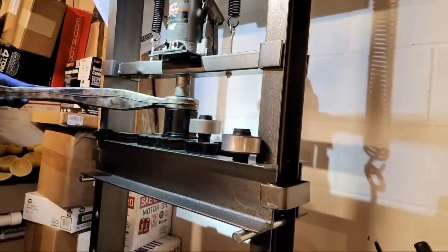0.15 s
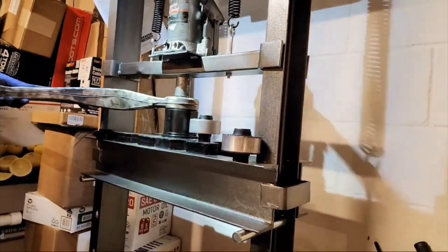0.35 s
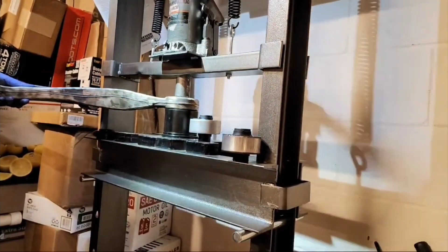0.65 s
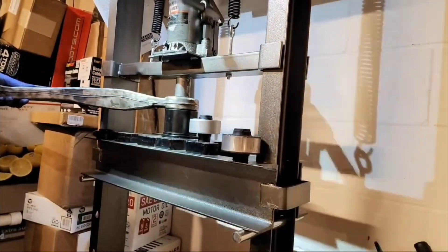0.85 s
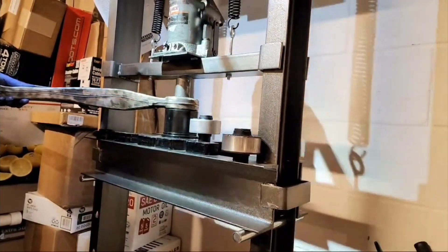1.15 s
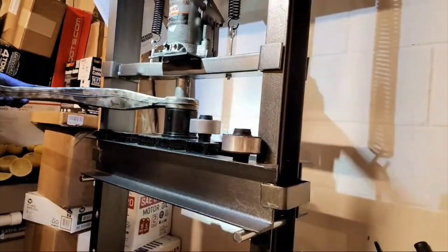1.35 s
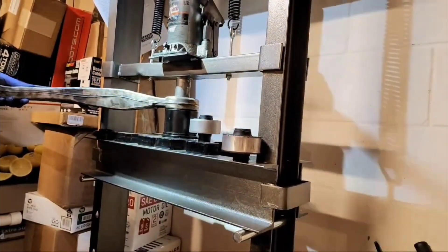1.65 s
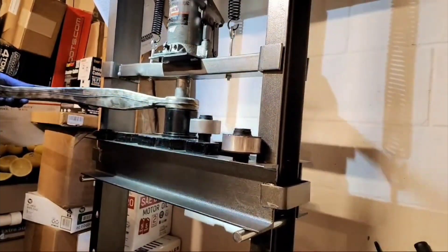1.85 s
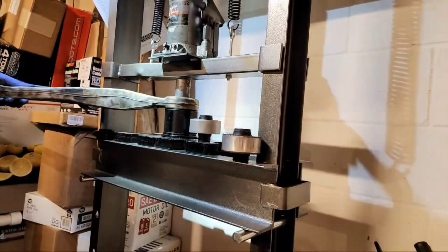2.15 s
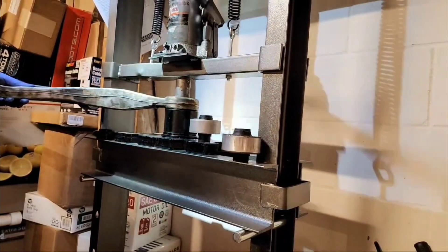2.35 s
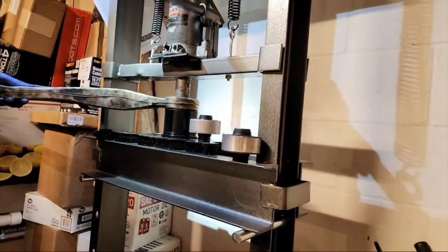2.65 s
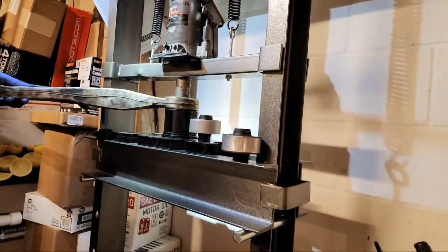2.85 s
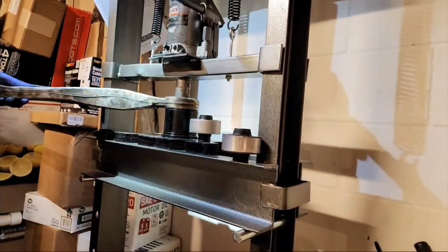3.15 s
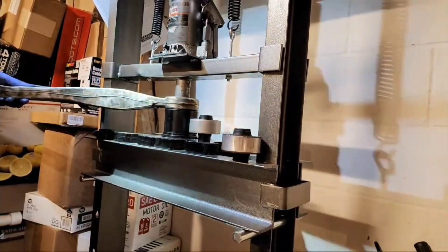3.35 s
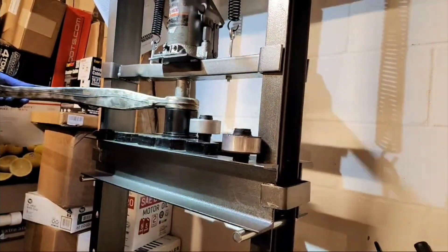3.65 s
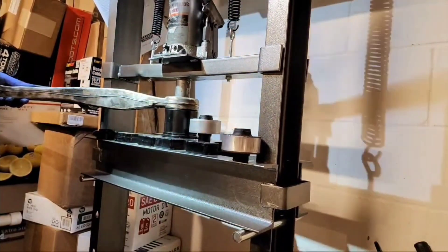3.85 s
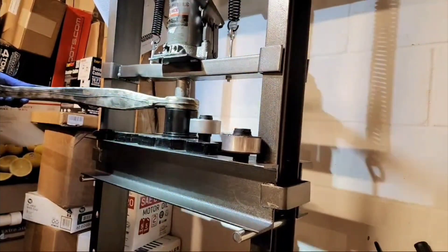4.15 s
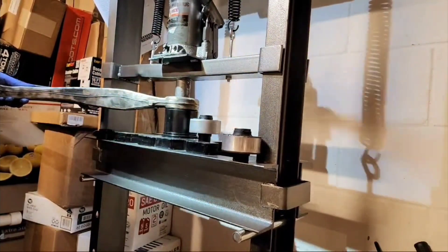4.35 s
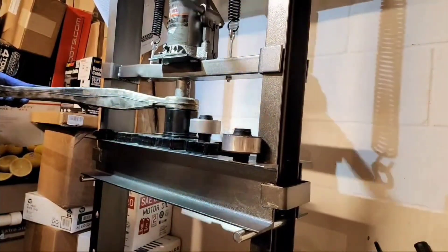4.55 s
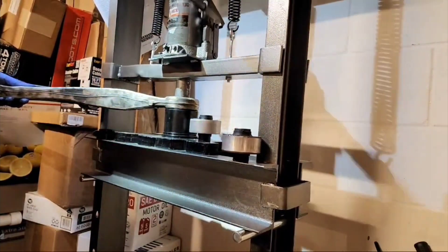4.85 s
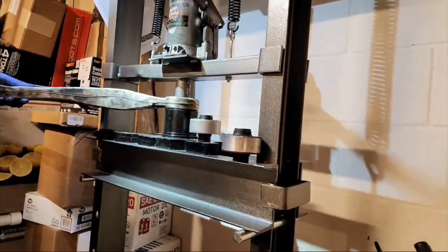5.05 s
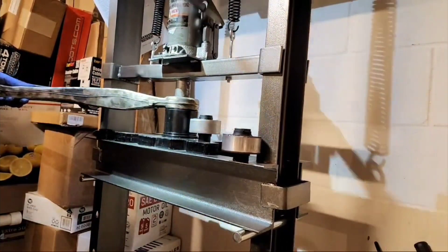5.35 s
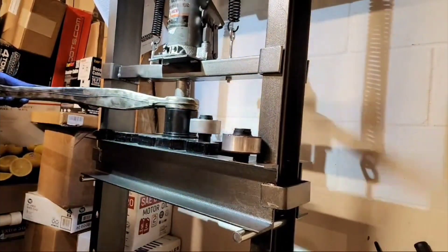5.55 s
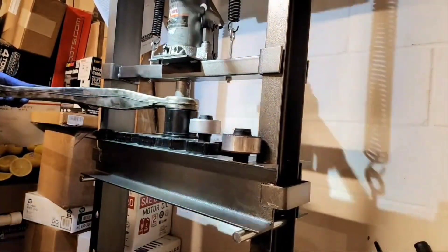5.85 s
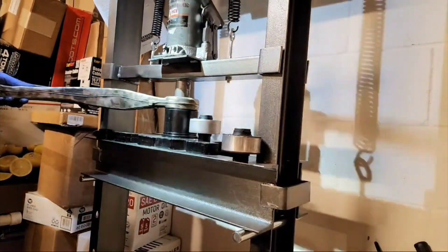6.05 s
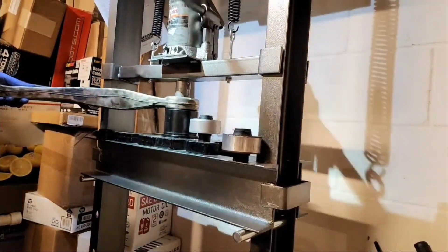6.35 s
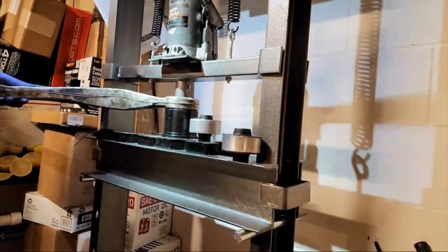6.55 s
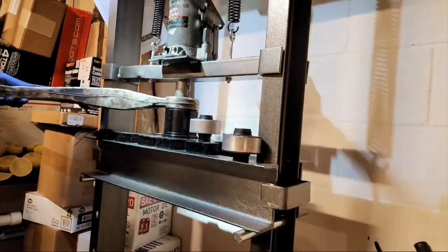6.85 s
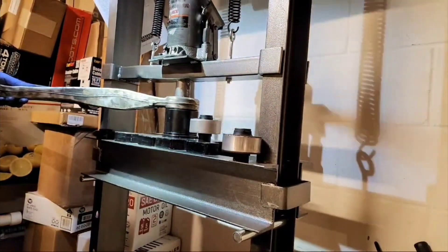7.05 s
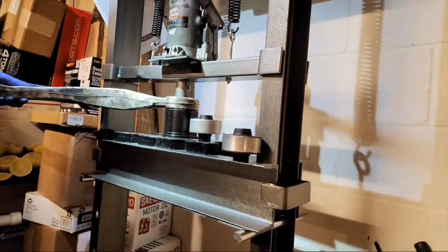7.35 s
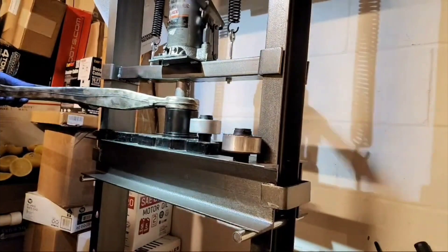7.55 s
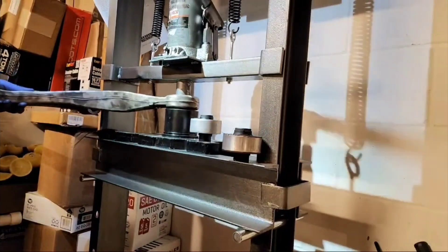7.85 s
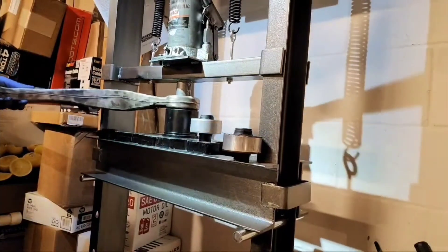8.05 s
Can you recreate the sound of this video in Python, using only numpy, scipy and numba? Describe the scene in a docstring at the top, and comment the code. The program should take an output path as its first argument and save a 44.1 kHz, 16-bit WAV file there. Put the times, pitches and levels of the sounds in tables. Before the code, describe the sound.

A hydraulic jack in a steel shop press is pumped by hand in a small workshop. From the start to about 1.6 seconds the strokes come very fast, six or seven pumps a second, clipped as if sped up. Every push and lift gives a bright, high chatter of loose metal linkage and a clack of pins, with a lighter piston knock and a dull thud from the frame. From about 1.7 seconds the pace drops to a steady two pumps or so a second, each with a down and an up clatter and a short room echo. The handle knocks its stop and rings faintly at around 1.8, 2.8, 3.7, 4.6 and 5.9 seconds. At about 7.7 seconds a longer, louder rattle ends the pumping, followed by a few tiny settling ticks just after 8 seconds. A faint low rumble and hiss lie underneath throughout.

```python
"""Pumping a bottle jack

A bottle jack in a steel shop press is pumped by hand in a small workshop; the opening strokes run at
triple speed with clipped tails, like a time-lapse. At each turn of the handle the loose linkage chatters
brightly and pins clack in the pump body; a moment later the piston knocks and the frame thuds. Each is
a train of impacts filtered by the resonances of the steel. The room answers with a short tail over a
low rumble, and a longer rattle ends the pumping."""
import sys
import numpy as np
from scipy import signal
from scipy.fft import rfft, irfft
from scipy.io import wavfile
from scipy.ndimage import uniform_filter1d, minimum_filter1d
from numba import njit

SR = 44100
rng = np.random.default_rng(int(sys.argv[2]) if len(sys.argv) > 2 else 0)


def unload_audio(sound):
    """Save the sound as a 16-bit wav file, at the path given as the first command line argument."""
    columns = np.transpose(np.atleast_2d(sound))
    # keep every value between -1 and 1, then stretch to whole-number steps
    steps = np.round(np.clip(columns, -1, 1) * 32767)
    wavfile.write(sys.argv[1], SR, steps.astype(np.int16))


N = 362051

# Spectra of the four impact sounds and of the room's hiss: frequency_hz, density_db
CHATTER_SPECTRUM = [(3180, -47), (5400, -36.5), (5790, -32), (7190, -36), (9090, -27.5), (10200, -11.5),
                    (11100, -14.5), (11300, -9), (11800, 0), (12500, -1.5), (13300, -3), (14600, -14.5),
                    (15500, -25)]  # includes the microphone's dip and treble peak
PUMP_SPECTRUM = [(1060, -30), (1800, -7.5), (2520, -10), (2750, -10), (3140, -4), (3420, -3.5),
                 (3960, -4.5), (4370, -2.5), (5020, -8.5), (5600, -29), (7280, -34), (12300, -120)]
PISTON_SPECTRUM = [(440, -10), (750, -1), (998, -2.5), (1110, 4.5), (1370, 4), (1470, 1), (1580, 1),
                   (2300, -1.5), (2990, -14), (5060, -120)]
FRAME_SPECTRUM = [(100, -39), (170, -7), (376, 3), (439, -1), (480, 1.5), (720, 0), (900, -7.5),
                  (1170, -18), (1980, -120)]
HISS_SPECTRUM = [(15, -53), (25, -13), (161, 5.5), (363, 0), (503, -8), (1130, -11), (1650, -13),
                 (2840, -27.5), (3520, -17), (6740, -60), (9320, -33), (12200, -14), (16000, -52.5)]
# The hiss sinks slowly, wavers and fades quickly at the very end: time_s, gain_db
HISS_LEVEL = [(0, 4.5), (7.9, 1.5), (8.03, -1.5), (8.16, 2), (8.21, -5.5)]
# The rumble swells slowly: time_s, gain_db
RUMBLE_SWELL = [(0, -63.5), (1.5, -68), (3.2, -64), (3.55, -59.5), (4.1, -59), (5.1, -65), (6.3, -64.5),
                (8.2, -70)]
# Base decay time, which each source scales; clipped in the triple-speed opening: time_s, t60_s
DECAY = [(0, 0.11), (1.55, 0.058), (1.65, 0.32), (7.6, 0.21), (8.2, 0.39)]
# Modes of the handle: pitch_hz, level_db, t60_s
HANDLE_MODES = [(578, -6, 0.25), (643, -9, 0.14), (1055, -5.5, 0.63), (1937, -2.5, 0.15), (2490, -8, 0.034),
                (3040, -4.5, 0.3), (4215, -6, 0.19), (4206, -5, 0.13)]
# Resonances of the steel, fed by every rattle: pitch_hz, width_hz, gain_db
STEEL_MODES = [(396, 57, -14), (480.8, 12, -3), (634, 14, -4), (892, 33, -0.5), (1122, 16, -12.5),
               (1472, 18, 5), (1662, 6, -8.5), (2450, 2.8, -12.5), (2506, 23, 2), (3084, 44, 1.5),
               (3160, 26, -3), (3770, 22, -1), (4298, 28, 2), (4470, 27, -3), (10570, 59, 7),
               (10940, 63, 2.5), (11580, 28, -9), (12200, 39, -1.5), (12700, 52, -2), (12900, 90, -9.5)]
# Lingering modes of the press frame: pitch_hz, width_hz, gain_db
FRAME_MODES = [(647, 33, -1), (740, 35, -8), (1115.4, 19, 1.5), (1664, 9.2, -3), (2300, 25, -11),
               (3210, 92, -14), (4370, 67, -10)]
# Handle pushed down; delays count from the take-up of play: start_s, full_chatter_delay_s, load_delay_s,
# thud_delay_s, first_chatter_db, full_chatter_db, take_up_db, load_db, knock_db, thud_db,
# chatter_hz, load_hz, knock_hz, thud_hz
PUSHES = [(0.048, .008, 0.023, 0.023, -26, -26.5, -40, -30.5, -29, -31, 12500, 3740, 1110, 800),
          (0.208, 0.011, 0.014, 0.018, -33.5, -25, -39, -34, -38.5, -36, 12000, 3413, 1420, 745),
          (0.373, .005, 0.0088, .010, -27, -24, -37.5, -35, -40.5, -39, 12000, 4390, 1500, 804),
          (.503, 0.019, 0.031, 0.029, -43, -26.5, -43, -36.5, -38, -38, 12200, 3500, 1610, 742),
          (0.671, 0.0043, .012, 0.021, -32, -25, -43, -39.5, -36, -36, 12200, 4300, 1450, 467),
          (0.819, 0.012, 0.022, 0.026, -40, -35.5, -38, -43, -39.5, -41.5, 12500, 4400, 1660, 660),
          (0.976, 0.006, 0.019, 0.018, -38, -25.5, -40, -37.5, -42.5, -36.5, 12166, 4240, 1100, 484),
          (1.139, 0.0068, 0.0051, 0.014, -25, -22, -37, -33.5, -35, -39, 12600, 4200, 1420, 407),
          (1.286, 0.017, .018, 0.015, -44, -27, -44, -34.5, -36, -35.5, 12100, 3994, 1290, 520),
          (1.438, 0.0054, 0.025, .016, -37, -36, -41, -38, -40, -37, 12160, 4370, 1700, 660),
          (1.673, 0.013, 0.033, 0.043, -38, -29.5, -39, -35, -35, -38, 12500, 4160, 1410, 520),
          (2.131, 0.022, 0.037, 0.056, -24.5, -24.5, -31, -30, -33.5, -35, 12700, 3950, 1397, 370),
          (2.603, .015, 0.034, 0.046, -29, -25, -33, -29.5, -30.5, -34.5, 12500, 3500, 1113, 360),
          (3.066, 0.0033, 0.034, 0.05, -34, -25.5, -32, -34, -32.5, -39.5, 12050, 4040, 1450, 730),
          (3.515, 0.021, 0.028, 0.04, -32.5, -24.5, -34.5, -33.5, -33, -41, 11600, 3560, 1416, 624),
          (3.978, .015, 0.036, 0.04, -29.5, -25, -31.5, -31.5, -33.5, -37.5, 12000, 3930, 1480, 710),
          (4.42, .004, 0.035, .040, -23, -24.5, -32, -33, -34.5, -36, 13000, 4500, 1430, 694),
          (4.879, 0.0061, 0.037, 0.042, -26, -26.5, -32, -37.5, -35.5, -40.5, 12600, 4430, 1370, 460),
          (5.337, .011, 0.037, 0.042, -29.5, -26, -32.5, -36.5, -34, -39, 12800, 3120, 1460, 640),
          (5.784, 0.021, .038, 0.045, -25.5, -24, -32, -36, -36, -40.5, 12400, 3400, 1460, 653),
          (6.243, 0.01, 0.036, 0.044, -28, -20, -31.5, -35.5, -34.5, -40, 13200, 3800, 1530, 655),
          (6.686, 0.021, 0.044, 0.044, -30, -23.5, -33, -36, -36.5, -41.5, 12900, 3950, 1210, 555),
          (7.135, 0.023, 0.037, 0.031, -24.5, -23, -32, -31, -39, -43, 12900, 4870, 1380, 680),
          (7.59, 0.022, 0.039, 0.031, -38.5, -21, -37, -32, -37, -46, 11250, 4540, 830, 615)]
# Handle pulled up: start_s, rattle_delay_s, rattle_length_s, top_delay_s, first_chatter_db, rattle_db,
# first_clack_db, top_clack_db, knock_db, thud_db, chatter_hz, first_clack_hz, top_clack_hz
LIFTS = [(0.095, 0.031, 0.0049, .018, -35, -21, -31, -45, -47, -41, 12000, 3854, 3854),
         (0.275, 0.015, 0.0085, .014, -26.5, -29, -44.5, -50, -60, -57, 11800, 4400, 4328),
         (0.427, 0.015, 0.013, 0.02, -34.5, -30, -38, -31, -41, -43.5, 12300, 3470, 4200),
         (0.58, 0.0092, 0.0086, 0.012, -31, -21.5, -45, -37, -45, -54, 12400, 3420, 3400),
         (0.739, 0.0085, 0.0073, 0.013, -25.5, -28, -35.5, -31, -44.5, -53, 12600, 4200, 4123),
         (0.885, 0.021, 0.013, 0.024, -33.5, -26.5, -38, -28, -44.5, -42.5, 12300, 4840, 4230),
         (1.047, 0.0087, 0.0065, 0.01, -29, -20.5, -39.5, -35.5, -51, -47, 12833, 3970, 4030),
         (1.204, 0.0049, 0.018, .015, -28, -26.5, -44, -25, -44, -54, 12661, 4425, 4270),
         (1.349, 0.025, .012, 0.024, -33, -24, -37.5, -30, -42, -47.5, 12100, 4200, 4300),
         (1.509, 0.024, 0.0076, 0.029, -37, -28, -42, -40.5, -48, -56, 12760, 4250, 4300),
         (1.825, 0.057, 0.018, 0.11, -28.5, -24, -30, -41.5, -46, -51.5, 12900, 3020, 4300),
         (2.328, 0.021, 0.016, .056, -33.5, -25, -35.5, -29.5, -42.5, -45.5, 12400, 4400, 3280),
         (2.739, 0.052, 0.021, 0.1, -21.5, -20, -27.5, -31.5, -41, -44, 12100, 3100, 3440),
         (3.249, 0.026, 0.034, 0.053, -31.5, -22, -36.5, -27.5, -49, -46.5, 12750, 4750, 4250),
         (3.654, 0.05, 0.061, 0.09, -28.5, -31, -32, -28.5, -42.5, -49.5, 12200, 4080, 3730),
         (4.161, 0.021, 0.036, 0.052, -34, -22.5, -35.5, -28, -44, -44, 12000, 3100, 4300),
         (4.580, 0.048, 0.021, 0.094, -34, -22.5, -34.5, -27, -44, -46.5, 12300, 3850, 4460),
         (5.072, 0.0323, 0.028, 0.03, -30.5, -18, -38.5, -29.5, -45.5, -45, 12600, 4860, 4170),
         (5.538, 0.026, 0.038, 0.051, -29.5, -26, -37.5, -29.5, -44, -47.5, 12800, 3230, 3160),
         (5.929, 0.063, 0.02, 0.11, -25.5, -26.5, -31, -29.5, -48, -47.5, 11200, 3920, 4050),
         (6.428, 0.023, 0.031, 0.045, -33, -20.5, -41, -25.5, -41.5, -47.5, 13100, 3030, 3170),
         (6.876, .031, 0.028, 0.049, -36.5, -24, -41, -29.5, -44.5, -52.5, 12700, 3900, 3180),
         (7.325, 0.027, 0.016, 0.06, -39, -22.5, -43.5, -33.5, -48, -50.5, 12200, 3180, 3160)]
# The loose handle shifts between strokes: start_s, chatter_db, clack_db, clack_hz
NUDGES = [(0, -44, -44.5, 4400), (2.036, -52, -56, 3900), (2.071, -51, -49, 4140),
          (2.572, -37.5, -39.5, 4160), (2.972, -60, -51, 4170), (3.057, -38, -42.5, 3130),
          (3.436, -52, -56.5, 4328), (3.866, -58, -58.5, 4180), (3.919, -61, -55, 2030),
          (4.34, -42.5, -40.5, 2220), (4.809, -36, -37, 4400), (5.259, -55.5, -50, 4140),
          (5.710, -49.5, -55, 4300), (6.604, -60, -50.5, 4440), (7.112, -48, -57, 4285),
          (7.890, -48, -48.5, 3000), (8.056, -57.5, -71, 4300), (8.151, -68, -82, 4200)]
# The handle strikes its stop: start_s, ring_db, knock_db, thud_db
STOPS = [(1.8374, -37.5, -35.5, -45.5), (2.755, -33, -32, -40.5), (3.6624, -32.5, -38, -42.5),
         (4.351, -57, -54, -51), (4.5816, -44.5, -39.5, -45.5), (4.8166, -60, -50, -54),
         (5.94, -36.5, -36, -39.5)]
# Last rattle, a row each for links, pins, piston and frame: rise_s, hold_s, level_db, fall_db_per_s
LAST_RATTLE = [(.03, 0.023, -14, 234), (0.0056, 0.033, -21.5, 200), (0.0057, 0.068, -29, 170),
               (0.007, 0.024, -38.5, 310)]
# The parts settle: start_s, level_db
TICKS = [(8.056, -49)]

TRIPLE_SPEED_UNTIL_S, LAST_RATTLE_S = 1.6, 7.683
# Envelope of each kind of blow, at triple speed then at normal speed: rise_s, hold_s
TAKE_UP, LOAD = ((.011, .012), (.0034, .014)), ((.0052, .013), (.00079, .022))
KNOCK, THUD = ((.01, .018), (.01, .015)), ((.01, .019), (.012, .04))
FIRST_CHATTER, FIRST_CLACK = ((.011, .014), (.0062, .0087)), ((.007, .016), (.007, .014))
TOP_CHATTER, TOP_CLACK = ((.003, .0065), (.003, .013)), ((.005, .0071), (.005, .0073))
LIFT_KNOCK, LIFT_THUD = ((.004, .013), (.015, .031)), ((.003, .013), (.011, .042))
RATTLE_CLACK = (.003, .013), (.003, .018)
# Pairs of settings: at triple speed, at normal speed
FIRST_RISE_S, FULL_RISE_S, RATTLE_RISE_S = (.0092, .002), (.008, .0038), (.0072, .007)
OVERRUN_S, TAKE_UP_HZ = (.00077, .0075), (4160, 3116)
DRAG_DB, RATTLE_CLACK_DB, STEEL_DB = (-35, -39.5), (-20, -12), (-2.5, .5)


def undb(db):
    """Amplitude ratio of a level in decibels."""
    return 10 ** (np.asarray(db) / 20)


def unit(x):
    """Normalisation to unit RMS."""
    return x / np.sqrt(np.mean(x ** 2))


def curve(points):
    """Linear interpolation of (time_s, value) points at every sample."""
    return np.interp(np.arange(N) / SR, *np.transpose(points))


def colour(x, spectrum):
    """Minimum-phase filtering to a given spectral shape; white noise keeps its power."""
    hz, db = np.transpose(spectrum)
    grid_hz = np.maximum(np.arange(2049) * SR / 4096, 1)
    grid_db = np.interp(np.log(grid_hz), np.log(hz), db, left=-70)
    cepstrum = irfft(grid_db * np.log(10) / 20)
    cepstrum[1:2048] *= 2  # folding onto positive time makes the filter causal
    cepstrum[2049:] = 0
    response = irfft(np.exp(rfft(cepstrum)))
    return signal.fftconvolve(x, response / np.sqrt(np.sum(response ** 2)))[:N]


@njit
def resonator(x, hz, damping):
    """Second-order resonance with a moving centre, unit gain there and Q = 1 / damping."""
    y, band, low = np.empty(len(x)), 0., 0.
    for i in range(len(x)):
        g = np.tan(np.pi * hz[i] / SR)
        velocity = (band + g * (x[i] - low)) / (1 + g * (g + damping))
        band, low = 2 * velocity - band, low + 2 * g * velocity
        y[i] = damping * velocity
    return y


@njit
def stored_energy(power, retention):
    """Leaky integration: energy accumulates and drains exponentially."""
    y, energy = np.empty(len(power)), 0.
    for i in range(len(power)):
        energy = energy * retention[i] + power[i] * (1 - retention[i])
        y[i] = energy
    return y


def forced_modes(x, modes):
    """Forced response: each narrow resonance passes the part of the drive near its pitch."""
    return sum(undb(db) * signal.lfilter(*signal.iirpeak(hz, hz / width, SR), x)
               for hz, width, db in modes)


def envelope(blows, last, rise_power, fall_scale):
    """Power-law rise, hold and exponential decay of each blow; the strongest prevails."""
    t = np.arange(N) / SR - LAST_RATTLE_S
    rise, hold, db, fall_db_per_s = last
    env = np.clip(t / rise, 0, 1) ** rise_power
    env *= undb(db - fall_db_per_s * np.maximum(t - rise - hold, 0))
    fall_s = fall_scale * curve(DECAY)
    for start, db, rise, hold, _ in blows:
        i = int(max(start, 0) * SR)
        t = np.arange(min(N - i, SR // 4)) / SR
        attack = np.minimum(t / rise, 1) ** rise_power
        decay = np.exp(-np.maximum(t - rise - hold, 0) / fall_s[i])
        env[i:i + len(t)] = np.maximum(env[i:i + len(t)], undb(db) * attack * decay)
    return env


def impacts(rate_hz, contact_s, spread_db, bed):
    """Shot noise: random contacts, each a short noise burst, over a bed of finer ones."""
    hits = (rng.random(N) < rate_hz / SR) * undb(spread_db * rng.standard_normal(N))
    bursts = signal.fftconvolve(hits, np.hanning(int(contact_s * SR) + 3), "same")
    return unit((unit(bursts) + bed) * rng.standard_normal(N))


def settling_pitch(blows, from_ratio, to_ratio, settle_s):
    """Relaxation: the pitch set by the latest blow sinks exponentially as the parts settle."""
    starts, *_, hz = np.transpose(blows)
    t = np.arange(N) / SR
    latest = np.maximum(np.searchsorted(starts, t) - 1, 0)
    age = np.maximum(t - starts[latest], 0)
    ratio = to_ratio + (from_ratio - to_ratio) * np.exp(-age / settle_s)
    return np.clip(hz[latest] * ratio, 100, 16000)


def room_noise():
    """Ambient noise: a faint broadband hiss and a low band of rumble that swells."""
    rumble = resonator(rng.standard_normal(N), np.full(N, 56.), damping=.37)
    rumble = resonator(rumble, np.full(N, 60.), damping=2.6)
    hiss = colour(rng.standard_normal(N), HISS_SPECTRUM)
    return undb(curve(HISS_LEVEL) - 57.5) * hiss + undb(curve(RUMBLE_SWELL) + 5.5) * unit(rumble)


def diffuse_tail(drive, gain_db, t60_scale):
    """Reverberation: a diffuse field is noise whose power follows the stored energy."""
    retention = 1e-6 ** (1 / (t60_scale * curve(DECAY) * SR))
    return undb(gain_db) * np.sqrt(stored_energy(drive ** 2, retention)) * rng.standard_normal(N)


def frame_hum(drive):
    """Energy storage: the frame keeps some of each blow and hums on faintly in its modes."""
    return forced_modes(diffuse_tail(drive, gain_db=4.8, t60_scale=1.8), FRAME_MODES)


def settling_tick():
    """A damped transient: the pump body gives a tiny dry tick as the parts settle."""
    t = np.arange(N) / SR
    env = sum(undb(db - 11) * (t > start) * np.exp(-np.maximum(t - start, 0) / .0098)
              for start, db in TICKS)
    return colour(env * rng.standard_normal(N), PUMP_SPECTRUM)


def handle_ring():
    """Free vibration: each knock on the stop excites the handle's modes in a different balance."""
    starts, ring_db, _, _ = np.transpose(STOPS)
    contact = np.hanning(int(.0068 * SR))
    scatter_db = 3 * rng.standard_normal((len(starts), len(HANDLE_MODES)))
    ring = 0
    for (hz, mode_db, t60), offset_db in zip(HANDLE_MODES, scatter_db.T):
        strikes = np.zeros(N)
        strikes[(starts * SR).astype(int)] = undb(ring_db + mode_db + offset_db - 3)
        pole = np.exp(2j * np.pi * hz / SR - np.log(1000) / (t60 * SR))
        # the ring grows in over the time of contact
        onset = contact * pole ** np.arange(len(contact)) / contact.sum()
        ring += signal.lfilter([1], [1, -pole], np.convolve(strikes, onset)[:N]).imag
    return ring


def frame_thuds(blows, last):
    """Heavy damping: the frame takes the load with a dull thump whose resonance sinks."""
    env = envelope(blows, last, rise_power=.99, fall_scale=.03)
    force = env * impacts(rate_hz=150, contact_s=.0097, spread_db=3.6, bed=1.9)
    ring = resonator(force, settling_pitch(blows, 1.02, .8, settle_s=.087), damping=.28)
    tail = diffuse_tail(env, gain_db=-7.5, t60_scale=1.68)
    return colour(undb(-4.5) * force + undb(-3) * ring + tail, FRAME_SPECTRUM)


def piston_knocks(blows, last):
    """Impact loading: the piston meets the oil after the linkage has taken up its play."""
    env = envelope(blows, last, rise_power=2.3, fall_scale=.055)
    force = env * impacts(rate_hz=350, contact_s=.0052, spread_db=1.6, bed=1.5)
    ring = resonator(force, settling_pitch(blows, 1.015, 1., settle_s=.083), damping=.039)
    tail = diffuse_tail(env, gain_db=-7.5, t60_scale=1.37)
    return colour(undb(-3.5) * force + undb(.5) * ring + tail, PISTON_SPECTRUM)


def pin_clacks(blows, last):
    """Impact excitation: hard contacts ring the pump body, each stressing another part."""
    env = envelope(blows, last, rise_power=.79, fall_scale=.033)
    force = env * impacts(rate_hz=450, contact_s=.0043, spread_db=.73, bed=.99)
    ring = resonator(force, settling_pitch(blows, 1.017, .85, settle_s=.3), damping=.028)
    tail = diffuse_tail(env, gain_db=-7, t60_scale=.77)
    return colour(undb(-4) * force + undb(2) * ring + tail, PUMP_SPECTRUM)


def link_chatter(blows, last):
    """Backlash: loose links and pins collide in a bright buzz, each time in a new shade."""
    env = envelope(blows, last, rise_power=.99, fall_scale=.022)
    force = env * impacts(rate_hz=330, contact_s=.0065, spread_db=1.2, bed=.97)
    ring = resonator(force, settling_pitch(blows, 1.0135, .85, settle_s=.35), damping=.05)
    tail = diffuse_tail(env, gain_db=-10, t60_scale=.75)
    return colour(undb(-2) * (force + ring) + tail, CHATTER_SPECTRUM)


def handle_blows():
    """Lost motion: parts strike in turn. Rows per part: start_s, level_db, rise_s, hold_s, pitch_hz."""
    links, pins, piston, frame = [], [], [], []
    for (start, full_delay, load_delay, thud_delay, first_db, full_db, take_up_db, load_db,
         knock_db, thud_db, chatter_hz, load_hz, knock_hz, thud_hz) in PUSHES:
        pace = int(start >= TRIPLE_SPEED_UNTIL_S)  # 0 triple speed, 1 normal
        # the links chatter from the take-up until just after the load arrives
        full_hold = max(load_delay - full_delay + OVERRUN_S[pace], .002)
        links += [(start + (0, .0024)[pace], first_db, FIRST_RISE_S[pace], full_delay * .84, chatter_hz),
                  (start + full_delay, full_db, FULL_RISE_S[pace], full_hold, chatter_hz)]
        pins += [(start, take_up_db, *TAKE_UP[pace], TAKE_UP_HZ[pace]),
                 (start + load_delay, load_db, *LOAD[pace], load_hz)]
        # piston and frame sound softly ahead of their main blow
        piston += [(start + .0012, knock_db - 17.5, .005, load_delay, 1800),
                   (start + load_delay - .002, knock_db, *KNOCK[pace], knock_hz)]
        frame += [(start + .0024, thud_db - 15.5, .008, thud_delay, 590),
                  (start + thud_delay - .002, thud_db, *THUD[pace], thud_hz)]
    for (start, delay, length, top_delay, first_db, rattle_db, clack_db, top_db,
         knock_db, thud_db, chatter_hz, clack_hz, top_hz) in LIFTS:
        pace = int(start >= TRIPLE_SPEED_UNTIL_S)
        rattle_s, top_s = start + delay, start + top_delay
        links += [(start, DRAG_DB[pace], .004, delay, 12200),  # a soft buzz until the rattle
                  (start + .0012, first_db, *FIRST_CHATTER[pace], 12200),
                  (rattle_s, rattle_db, RATTLE_RISE_S[pace], length, chatter_hz),
                  (top_s, top_db + 1, *TOP_CHATTER[pace], chatter_hz)]
        pins += [(start, clack_db, *FIRST_CLACK[pace], clack_hz),
                 (rattle_s + .0089, rattle_db + RATTLE_CLACK_DB[pace], *RATTLE_CLACK[pace], 4000),
                 (top_s, top_db, *TOP_CLACK[pace], top_hz)]
        piston += [(start + .003, knock_db - 7, .005, min(delay, .03), 1500),
                   (rattle_s + .0051, knock_db, *LIFT_KNOCK[pace], 1700)]
        frame += [(start + .0052, thud_db - 4, .008, min(delay, .03), 560),
                  (rattle_s + (.0054, .016)[pace], thud_db, *LIFT_THUD[pace], 640)]
    for start, chatter_db, clack_db, clack_hz in NUDGES:
        links.append((start, chatter_db, .003, .008, 12600))
        pins.append((start, clack_db, .004, .008, clack_hz))
        piston.append((start, clack_db - 7, .003, .015, 1500))
        frame.append((start, clack_db - 9.5, .003, .02, 620))
    for start, _, knock_db, thud_db in STOPS:
        piston.append((start - .008, knock_db, .006, .017, 1100))
        frame.append((start - .002, thud_db, .004, .05, 530))
    return [sorted(rows) for rows in (links, pins, piston, frame)]


def scene():
    """Superposition: the impacts, the resonances they drive and the room add in one channel."""
    links, pins, piston, frame = zip(handle_blows(), LAST_RATTLE)
    heavy_blows = pin_clacks(*pins) + piston_knocks(*piston) + frame_thuds(*frame)
    rattles = link_chatter(*links) + heavy_blows
    steel_gain = undb(np.where(np.arange(N) < TRIPLE_SPEED_UNTIL_S * SR, *STEEL_DB))
    steel_ring = forced_modes(steel_gain * rattles, STEEL_MODES)
    return (rattles + steel_ring + frame_hum(heavy_blows) + handle_ring()
            + settling_tick() + room_noise())[None]


def record(dry):
    """Peak and band limiting: a smoothed gain holds down the peaks, then a low-pass cuts the top."""
    ceiling, cutoff_hz = .3, 15750
    needed_gain = ceiling / np.maximum(np.abs(dry), ceiling)
    gain = uniform_filter1d(minimum_filter1d(needed_gain, size=129), size=65)
    return signal.sosfilt(signal.ellip(8, .2, 70, cutoff_hz, fs=SR, output="sos"), gain * dry)


dry = scene()
out = record(dry)
unload_audio(out)
```